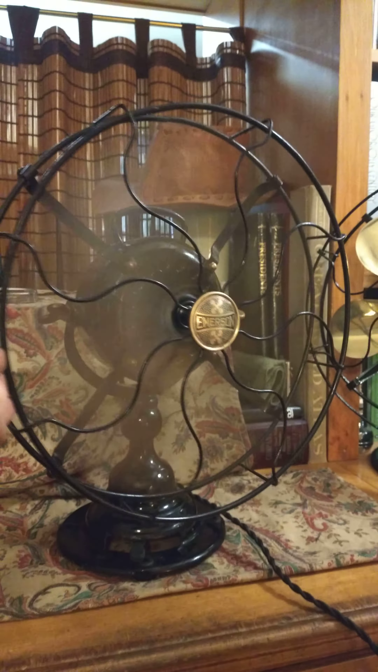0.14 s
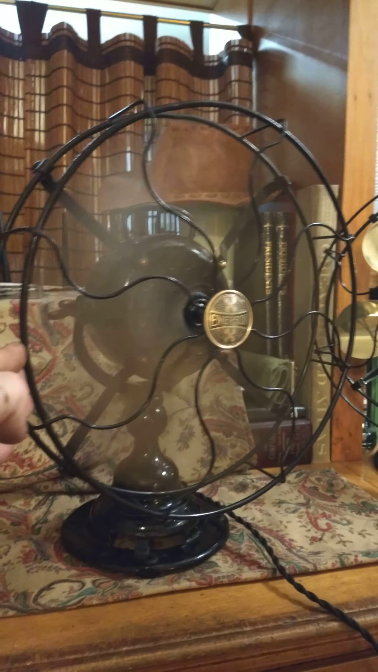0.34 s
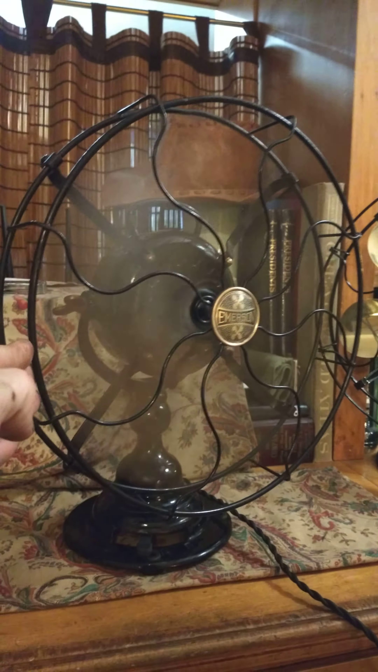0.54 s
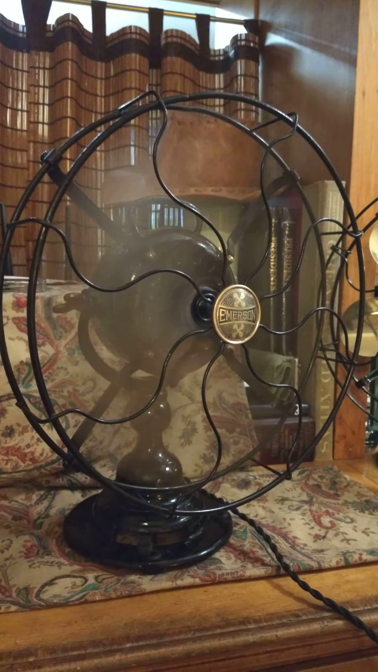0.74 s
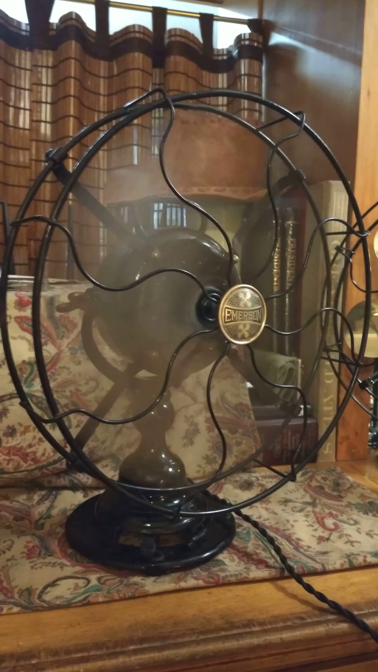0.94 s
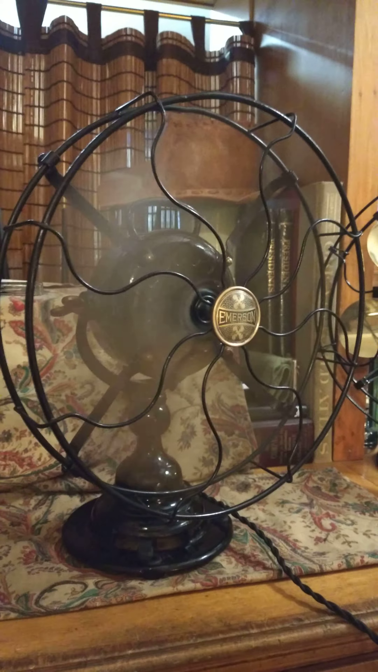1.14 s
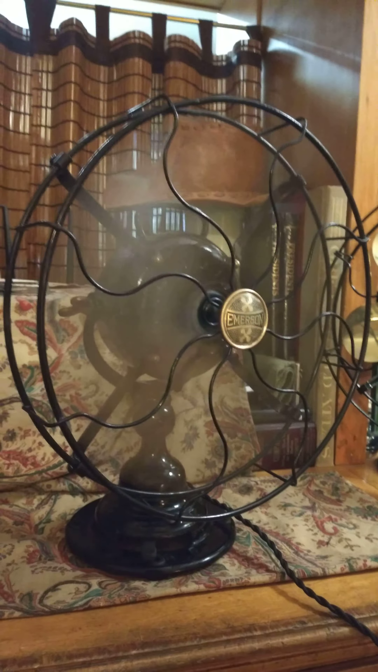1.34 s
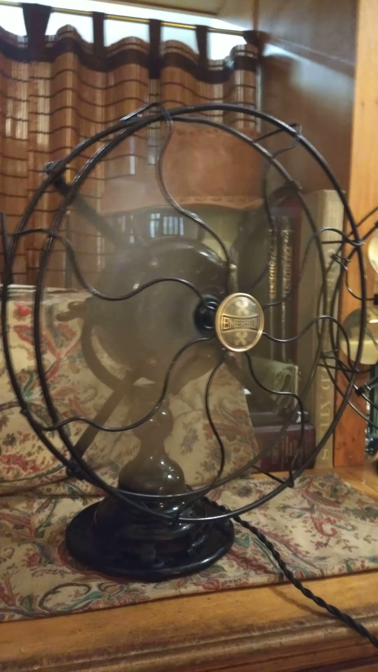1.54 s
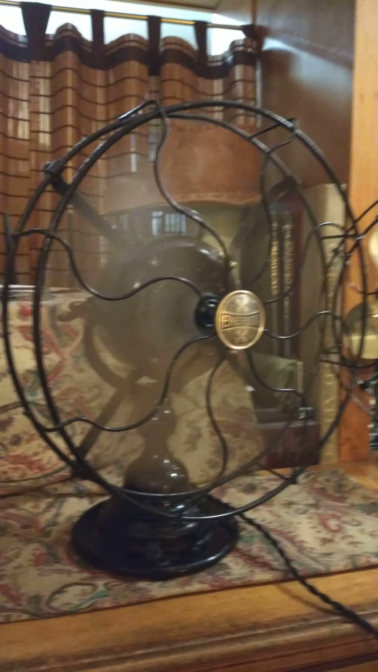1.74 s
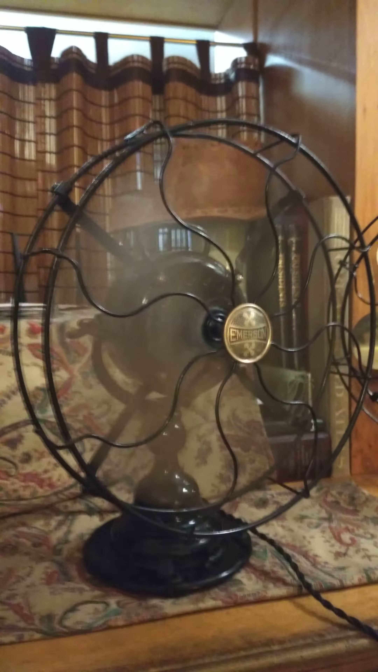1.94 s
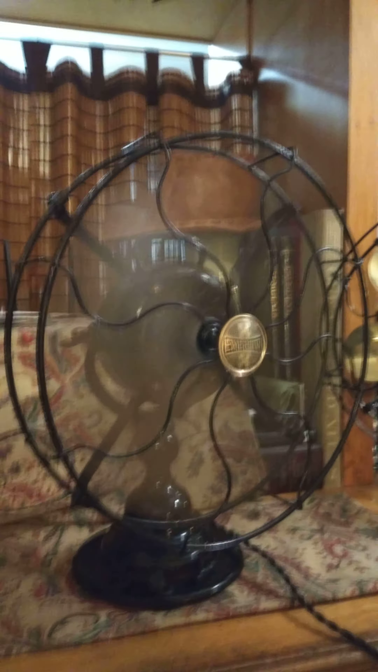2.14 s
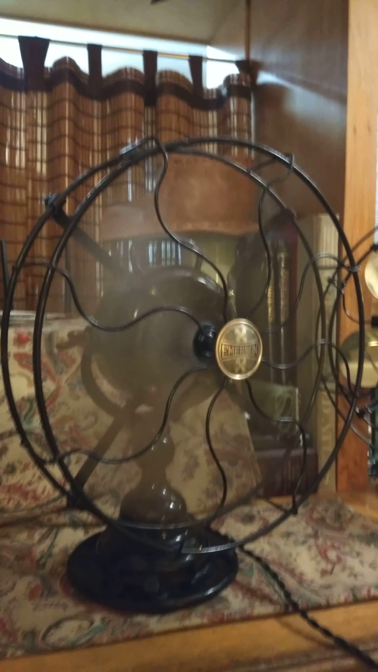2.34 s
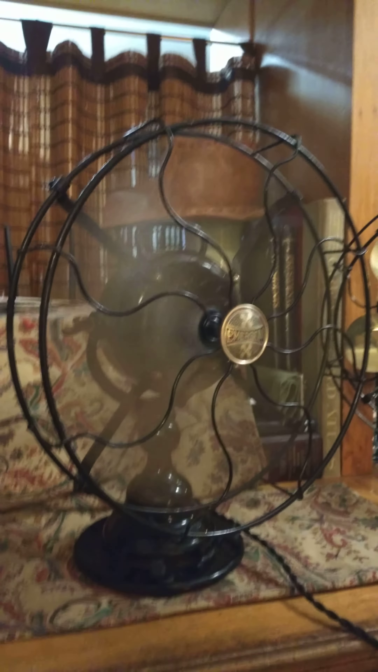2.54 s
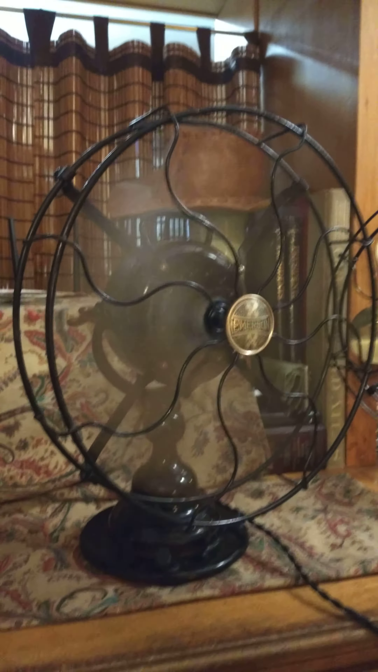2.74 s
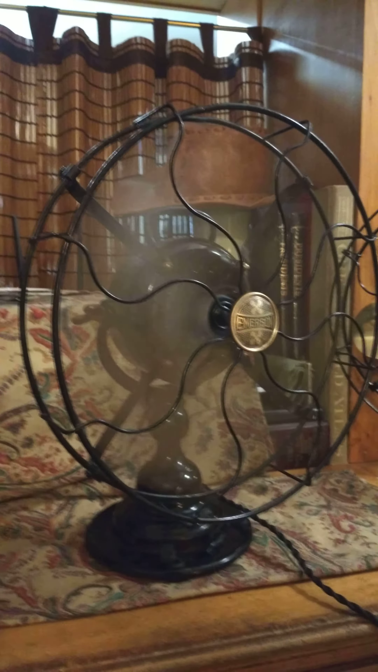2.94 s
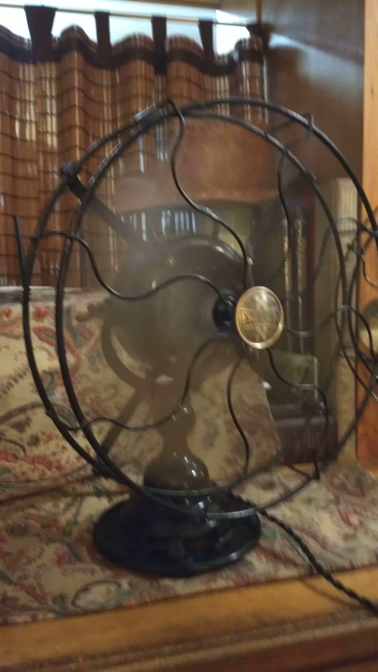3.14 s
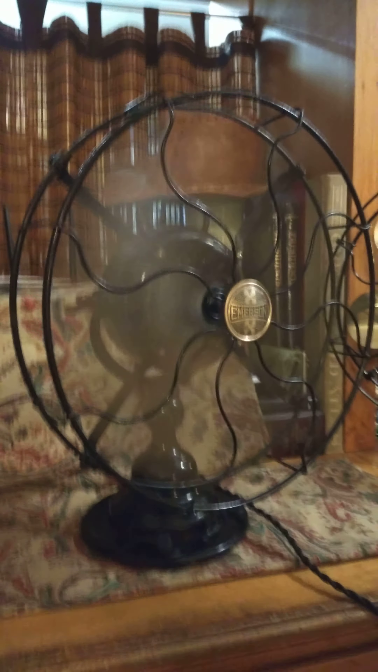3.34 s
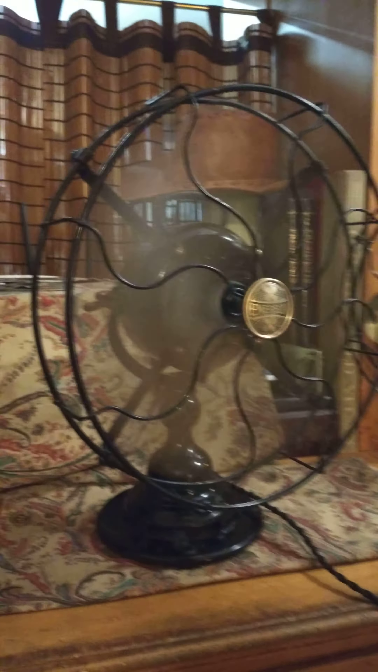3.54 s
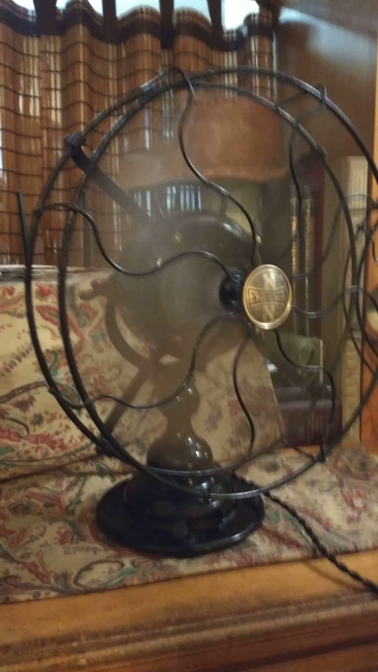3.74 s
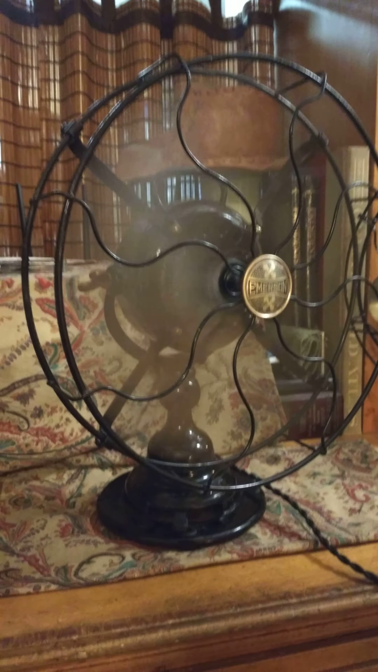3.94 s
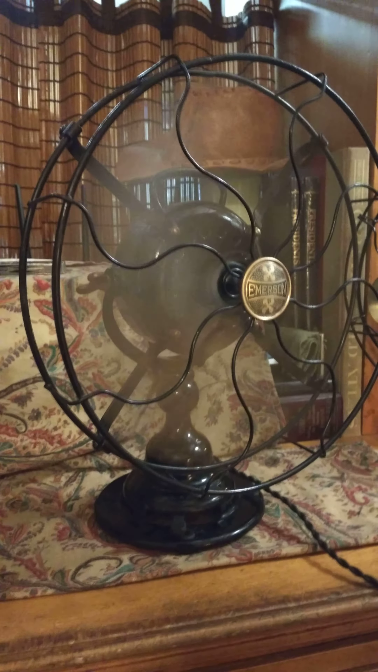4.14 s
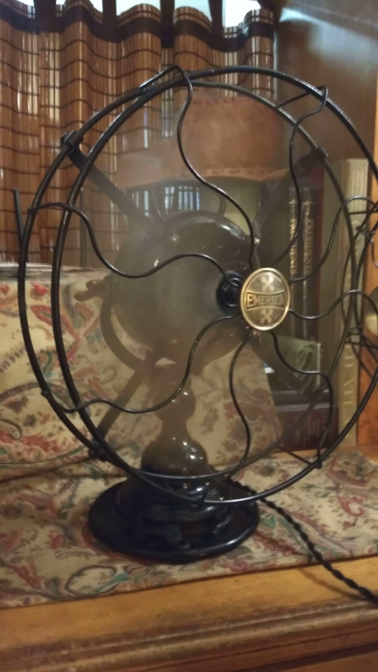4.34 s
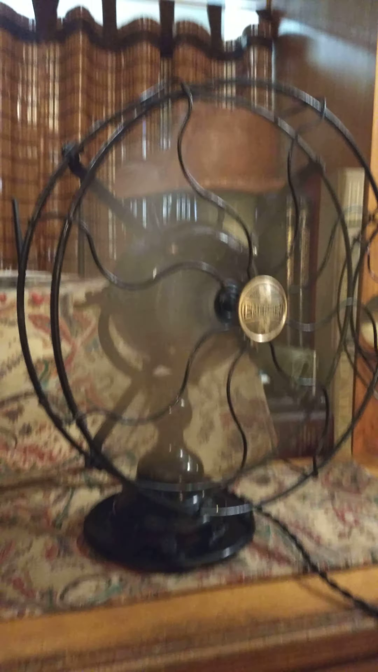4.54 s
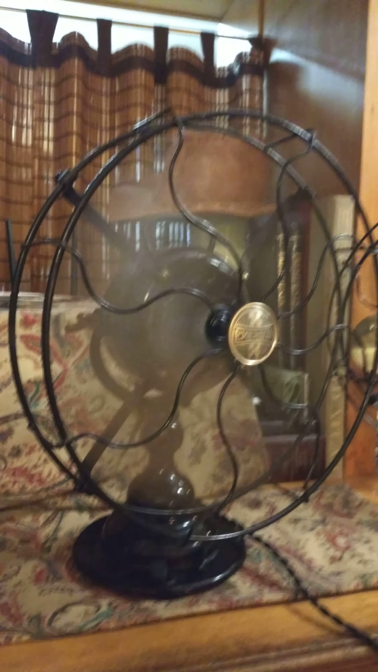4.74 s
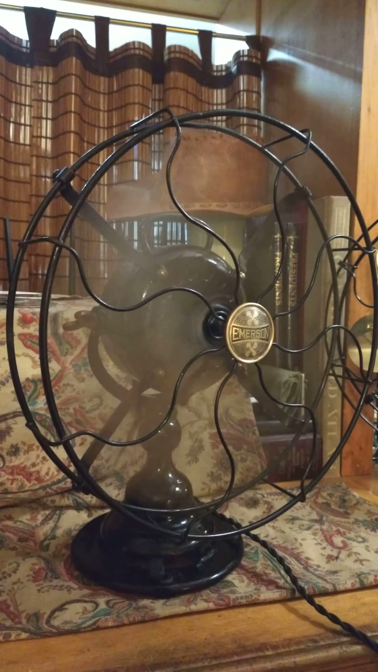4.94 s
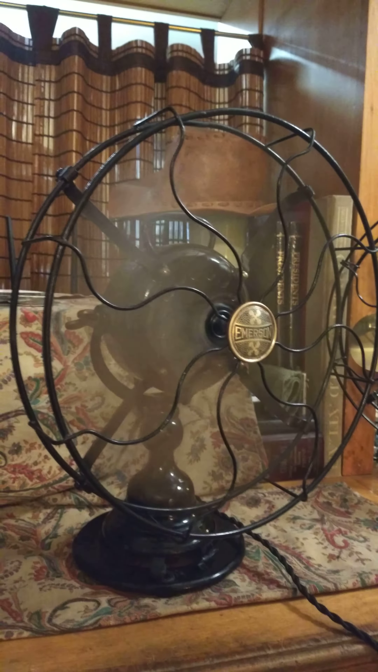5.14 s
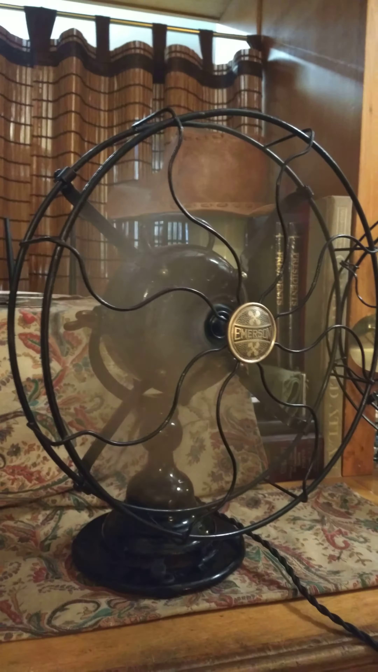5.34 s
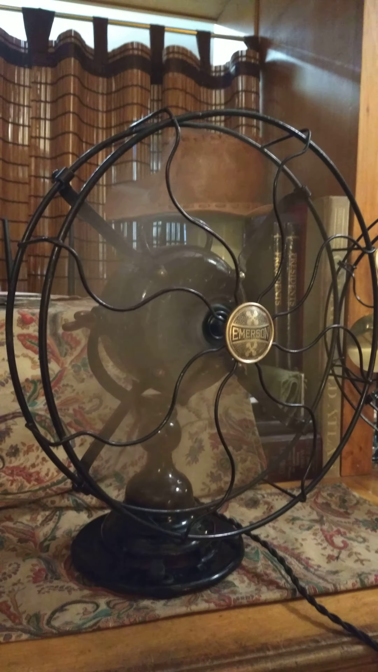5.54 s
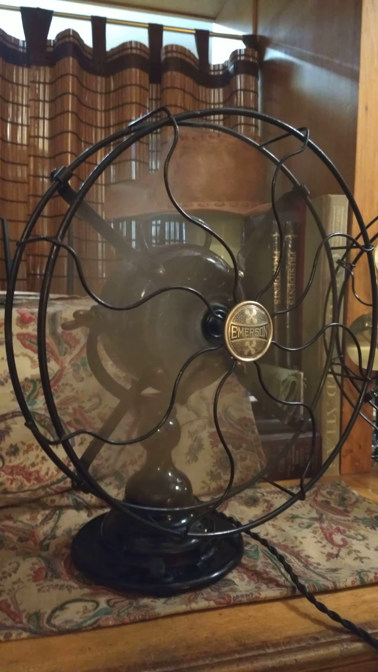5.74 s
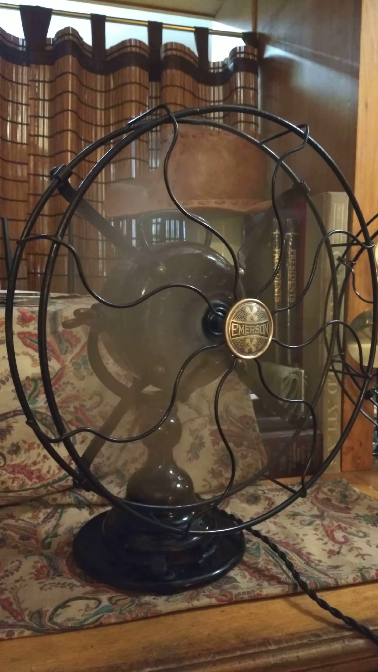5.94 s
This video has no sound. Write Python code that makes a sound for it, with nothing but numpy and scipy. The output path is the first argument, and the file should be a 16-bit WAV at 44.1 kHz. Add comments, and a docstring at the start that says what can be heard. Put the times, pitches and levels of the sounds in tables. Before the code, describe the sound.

An old four-bladed desk fan swells up close indoors, rushing air fluttering over a low motor hum, with handling bumps and ticks near two seconds.

```python
"""An old four-bladed desk fan runs close to a hand-held phone; its sound swells in over the first 1.3 s.
Turbulent air swishes past each blade, with tones on the shaft's multiples and the motor's mains hum.
A hand cups the two microphone ports from the start, with soft bumps; near 2 s the grip shifts with more
bumps and dry ticks, the sound dips and the hand lifts off. Single eddies then spit until about 4.4 s.
From 4.1 s the fan sinks slowly as the phone drifts off, and from 4.75 s the low drone grows."""
import sys
import numpy as np
from scipy import signal
from scipy.fft import rfft, irfft
from scipy.io import wavfile
from scipy.ndimage import uniform_filter1d

SR = 44100
rng = np.random.default_rng(int(sys.argv[2]) if len(sys.argv) > 2 else 0)


def to_wav(sig):
    """Store sig (one row per channel, or 1-D mono) as 16-bit WAV at the path in sys.argv[1].

    Samples outside -1..1 are clipped; the rate is SR.
    """
    pcm = np.clip(np.atleast_2d(sig), -1, 1) * 32767
    pcm = np.round(pcm).astype(np.int16)
    wavfile.write(sys.argv[1], SR, pcm.T)  # frames by channels


N = 267687
TIME = np.arange(N) / SR  # s
FREQS = np.arange(N // 2 + 1) * SR / N  # Hz

SHAFT_HZ = 27.45
# peak swish of each of the four unevenly bent blades: level/dB
BLADES = [1.86, 3.6, 3.2, 1.9]


def undb(db):
    """Amplitude ratio from decibels: a factor of ten for every 20 dB."""
    return 10 ** (np.asarray(db) / 20)


def rms(x):
    """Effective value: the root of the mean square."""
    return np.sqrt(np.mean(x ** 2))


def level_curve(table):
    """Level against time by linear interpolation in dB."""
    t, db = np.transpose(table)
    return np.interp(TIME, t, db)


def colour(x, gain):
    """Linear filtering: the spectrum is multiplied by one gain for each of FREQS."""
    return irfft(rfft(x) * gain, N)


def bell(hz, width):
    """Gaussian resonance curve, 1 at its centre and 1/e at width Hz to either side."""
    return np.exp(-((FREQS - hz) / width) ** 2)


def port_gains(table):
    """Resonances in cascade: their dB gains add, separately at the left and right port."""
    db = 0
    for hz, width, left_db, right_db in table:
        db = db + np.outer([left_db, right_db], bell(hz, width))
    return undb(db)


def walk(rate):
    """Low-pass random process of unit spread, changing about rate times a second."""
    k = max(int(SR / rate), 2)
    steps = np.repeat(rng.standard_normal(N // k + 1), k)
    smooth = uniform_filter1d(uniform_filter1d(steps, k), k)[:N]
    return smooth / smooth.std()


def ramp(start, length):
    """Linear transition from 0 to 1 over length seconds."""
    return np.clip((TIME - start) / length, 0, 1)


def finger_shade(start, hold):
    """Shading by an obstacle: a finger comes near, stays hold seconds and lifts, 0 to 1 and back."""
    press_s, lift_s = 0.035, 0.16
    return ramp(start, press_s) - ramp(start + press_s + hold, lift_s)


def tone(cycles, lean, skew=0.28):
    """Near-field level and phase difference: a sine stronger and a little later at the right port."""
    phase = 2 * np.pi * cycles
    difference = lean * (np.sin(phase) - skew * np.cos(phase))
    return np.sin(phase) + np.array([[-1], [1]]) * difference


def shaft_turns():
    """Angle as the integral of speed: turns of a shaft whose nearly steady speed wanders by about 0.1 %."""
    return np.cumsum(SHAFT_HZ * (1 + 0.001 * walk(1.45))) / SR


def air(turns, hiss_db, rise=0.24, eddy_db=1.35, flutter_db=0.31, spit_s=0.0015, hiss_hz=2400, hiss_depth=0.6):
    """Modulated turbulence: noise flares at each blade pass and breaks into eddies; the hiss is smoother."""
    # turbulence spectrum: f/Hz, level/dB per Hz common to both ports, level/dB per Hz opposite in them
    spectrum = [(35, -63, -94), (70, -71, -76), (193, -63.5, -76), (316, -61.5, -80), (432, -62, -76.5),
                (567, -70, -76), (913, -64, -76), (1290, -63.5, -68.5), (1734, -65, -65),
                (2150, -67, -73.5), (4260, -80, -79), (6360, -82.5, -84), (8670, -97, -96.5),
                (15500, -97.5, -99.5)]
    # single strong eddies that make the rush spit: t/s, flare level/dB
    eddies = [(1.997, 3), (2.069, 4), (2.449, 7), (2.908, 8), (3.77, 12), (4.069, 7.5), (4.143, 10),
              (4.252, 12), (4.361, 9)]

    def turbulence(db):
        density = undb(np.interp(np.log(FREQS + 1), np.log(hz), db))
        return colour(rng.standard_normal(N), density * np.sqrt(SR / 2))

    hz, common_db, opposite_db = np.transpose(spectrum)
    common, opposite = turbulence(common_db), turbulence(opposite_db)
    ports = np.array([common + opposite, common - opposite])

    passes = turns * len(BLADES)
    blade = passes.astype(int) % len(BLADES)
    age = passes % 1 / rise  # each swish peaks early in the blade's pass and trails off
    swish_db = np.array(BLADES)[blade] * age * np.exp(1 - age)
    spit_db = sum(db * np.exp(-((TIME - t) / spit_s) ** 2) for t, db in eddies)

    rush = colour(ports, 1 / (1 + (FREQS / hiss_hz) ** 4))
    hiss = ports - rush
    rush_gain = undb(swish_db + spit_db + eddy_db * walk(450) + flutter_db * walk(24.96))
    hiss_gain = undb(hiss_depth * (swish_db + eddy_db * walk(450)))
    # each gain is scaled to an effective value of 1, so only its shape matters
    return rush * rush_gain / rms(rush_gain) + hiss * undb(hiss_db) * hiss_gain / rms(hiss_gain)


def blade_tone(turns, db, order, smear, lean):
    """Harmonic of the blade-passing frequency; the inflow stirs its phase by smear cycles."""
    cycles = order * len(BLADES) * turns + smear * walk(6)
    return np.sqrt(2) * undb(db) * tone(cycles, lean)


def blade_overtones(turns):
    """Harmonic series: the blade rate's strong second and third partials, each with its own level curve."""
    # second harmonic before its offset: t/s, level/dB
    second_levels = [(0.12, -66), (0.27, -49.5), (0.53, -55.5), (1.36, -32.5), (1.46, -39.5), (2.17, -45),
                     (2.79, -36), (2.97, -42), (3.52, -35.5), (3.73, -44.5), (3.77, -59), (3.81, -46),
                     (3.91, -36), (4.21, -58), (4.29, -40.5), (5.17, -38), (5.19, -41.5), (6.07, -40)]
    # third harmonic before its offset and chance waver: t/s, level/dB
    third_levels = [(0, -55), (.3, -53), (.88, -50), (.98, -38), (1.45, -38.5), (1.8, -50), (2.3, -48),
                    (3.2, -42.5), (6.07, -48)]
    second_db = 4.5 + level_curve(second_levels)
    third_db = -0.5 + level_curve(third_levels) + 3 * walk(8)
    second = blade_tone(turns, second_db, order=2, smear=0.043, lean=0.037)
    third = blade_tone(turns, third_db, order=3, smear=0.15, lean=0.051)
    return second + third


def rotor(turns, drone_db, waver_db=0.24, smear=0.0061, drone_hz=200):
    """Rotational harmonics: uneven inflow shakes the high orders more; drone_db lifts those below drone_hz."""
    # weaker rotor tones: multiple of the shaft rate, level/dB, lean towards the right port (0-1)
    orders = [(2, -57, .22), (3, -48, .17), (4, -42.5, .28), (5, -59, .3), (6, -52, .04), (9, -54, .08),
              (10, -55, .08), (15, -57, .15), (16, -50, .27), (17, -52, .55), (20, -62, .6), (24, -62, .15)]
    out = 0
    for order, db, lean in orders:
        level_db = db + waver_db * order * walk(11) + drone_db * (order * SHAFT_HZ < drone_hz)
        cycles = order * turns + smear * order * walk(9)
        out = out + np.sqrt(2) * undb(level_db) * tone(cycles, lean)
    return out


def motor_hum(drone_db):
    """Magnetic force follows the flux squared: the motor's iron flexes at twice the mains rate."""
    hum_hz, hum_db, hum_lean = 120, -43, 0.29
    return np.sqrt(2) * undb(hum_db + drone_db) * tone(hum_hz * TIME, hum_lean)


def drone_level():
    """Position dependence of low tones: their level in dB grows as the phone changes place."""
    start_db, end_db = 0.5, 3.5
    return start_db + (end_db - start_db) * ramp(4.75, 0.55)


def loudness():
    """Level against distance and shading: fan level in dB with a swell, a dip as the grip shifts, and a drift."""
    hold_db, swell_from_db, swell_s = 0.56, -14, 1.344
    drift_from_s, drift_db_per_s = 4.1, 0.58
    swell = swell_from_db * (1 - ramp(0, swell_s))
    drift = drift_db_per_s * np.maximum(TIME - drift_from_s, 0)
    return hold_db + swell - drift - 3 * finger_shade(1.916, 0.28)


def past_case_and_hand(fan):
    """Resonant transmission: the case colours the sound, and so does the cupped hand until it lifts off."""
    # colour of the phone's case: f/Hz, width/Hz, left port level/dB, right port level/dB
    case_resonances = [(1836, 420, -3.5, -2.5), (5000, 4900, 0, 0.5), (11170, 4100, -6, 8.5)]
    # hollow of the cupped hand: f/Hz, width/Hz, left port level/dB, right port level/dB
    hand_resonances = [(429, 24, 1, 3.5), (660, 98, -2, -2.5), (1927, 430, -11, 12), (2800, 540, -35, -5),
                       (4320, 230, 0, 5.5), (8600, 900, 0, -3.5), (10100, 1400, -1, 3)]
    bare = colour(fan, port_gains(case_resonances))
    cupped = 1 - ramp(2.0, 0.25)  # the hand lifts off from 2.0 s to 2.25 s
    return (1 - cupped) * bare + cupped * colour(bare, port_gains(hand_resonances))


def handling(push_s=0.00099, ring_cycles=8.8, tick_t60_s=0.0038):
    """Impact excitation: bumps ring as damped sines at the left port; ticks are noise bursts at the right."""
    # fingers bump the case: t/s, amplitude level/dB before push and decay, f/Hz
    bumps = [(0.031, -18.5, 260), (0.035, -14, 121), (0.068, -20.5, 240), (0.072, -21, 85),
             (1.936, -21, 215), (2.092, -18, 130), (2.11, -17.5, 85), (2.17, -24, 75), (2.29, -21, 70)]
    # the case ticks under the fingers: t/s, peak level/dB, f/Hz, width/Hz
    ticks = [(1.9373, -25, 6000, 7000), (1.9416, -10.5, 4000, 9000), (1.9455, -27, 7500, 5000),
             (2.028, -26, 6000, 8000), (2.1025, -14, 3500, 8000), (2.102, -17, 6000, 1600)]
    ports = np.zeros((2, N))
    for t, db, hz in bumps:
        age = np.maximum(TIME - t, 0)
        push = 1 - np.exp(-age / push_s)
        decay = np.exp(-np.log(1000) * age * hz / ring_cycles)  # down 60 dB after ring_cycles
        ports[0] += undb(db) * push * decay * np.sin(2 * np.pi * hz * age)
    for t, db, hz, width in ticks:
        decay = (TIME >= t) * np.exp(-np.log(1000) * np.abs(TIME - t) / tick_t60_s)
        tick = colour(decay * rng.standard_normal(N), bell(hz, width))
        ports[1] += undb(db) * tick / np.abs(tick).max()
    return ports


def scene():
    """Superposition: the fan's sources add at the two ports, past the case and the hand, with the handling."""
    turns = shaft_turns()
    drone_db = drone_level()
    hiss_db = -0.25 - 2.5 * finger_shade(2.12, 0.15)  # the moving fingers shade the hiss last
    fan = undb(loudness()) * (air(turns, hiss_db) + rotor(turns, drone_db) + motor_hum(drone_db))
    fan = fan + blade_overtones(turns)
    return past_case_and_hand(fan) + handling()


def record(dry):
    """Delay-and-subtract: the phone widens its stereo by taking a delayed copy of the other port from each."""
    # share of the other port that is taken away: f/Hz, share (0-1)
    crossfeed = [(1000, 0.89), (3000, 0.69), (16000, 0.92)]
    port_lag_s, low_cut_hz, top_hz = 0.000457, 61, 15800
    share = np.clip(np.interp(FREQS, *np.transpose(crossfeed)), 0, 1)
    delay = np.exp(-2j * np.pi * FREQS * port_lag_s)
    wide = dry - colour(dry[::-1], share * delay)
    rumble_cut = signal.butter(4, low_cut_hz, "high", fs=SR, output="sos")
    top_cut = signal.ellip(10, .2, 80, top_hz, fs=SR, output="sos")
    return signal.sosfilt(top_cut, signal.sosfilt(rumble_cut, wide))


dry = scene()
out = record(dry)
to_wav(out)
```